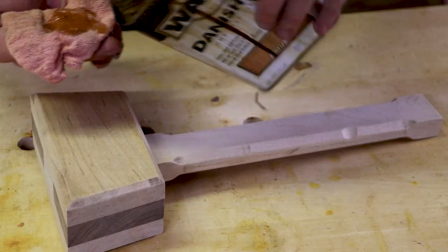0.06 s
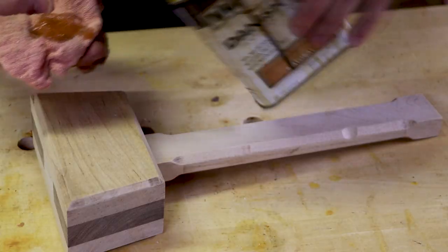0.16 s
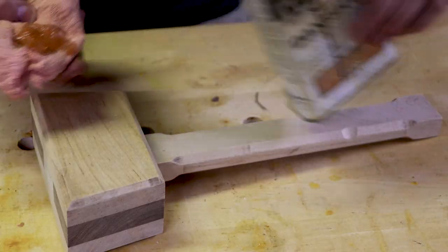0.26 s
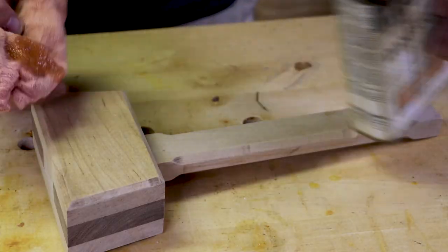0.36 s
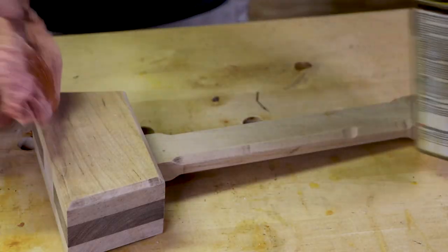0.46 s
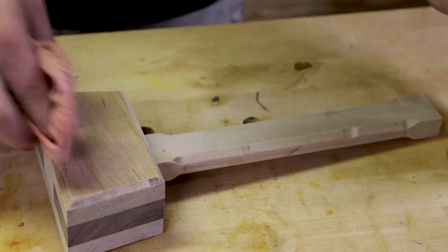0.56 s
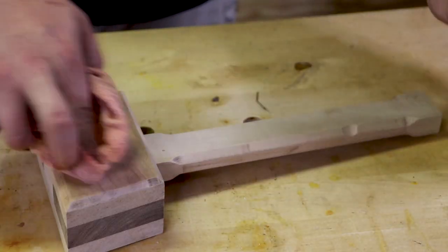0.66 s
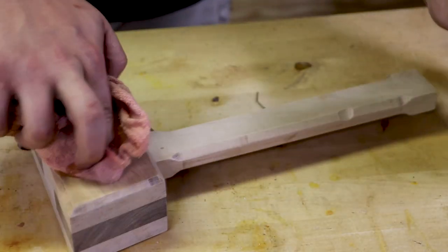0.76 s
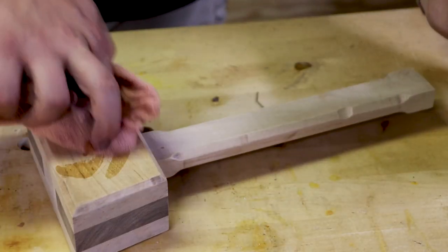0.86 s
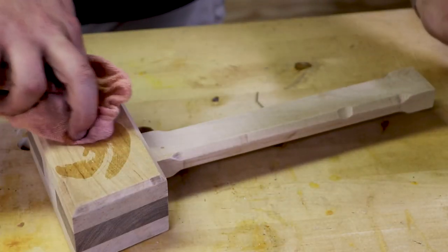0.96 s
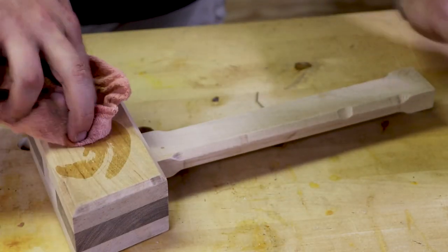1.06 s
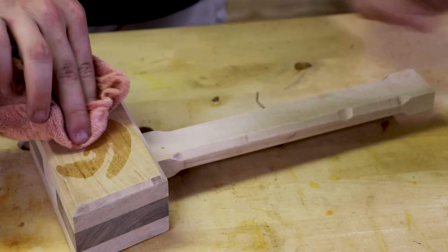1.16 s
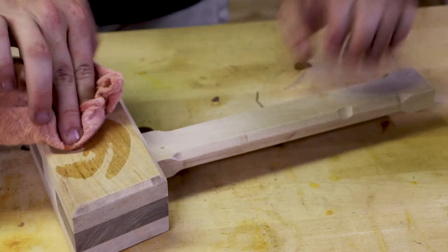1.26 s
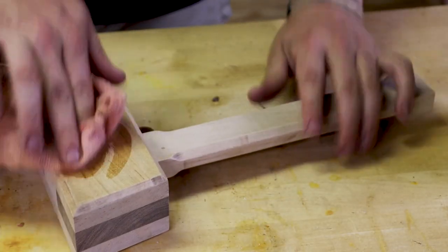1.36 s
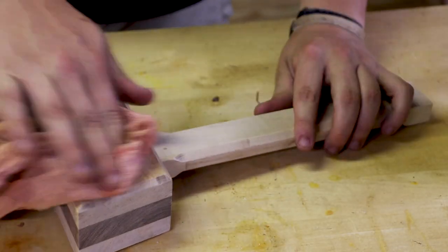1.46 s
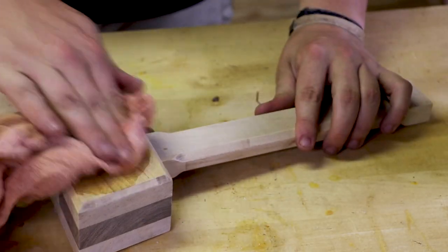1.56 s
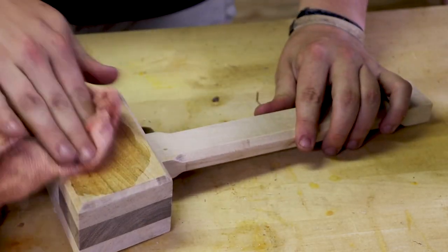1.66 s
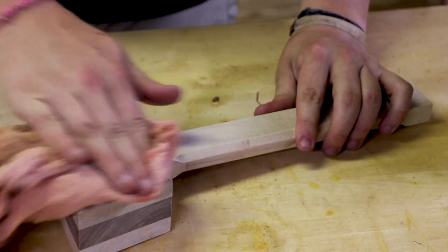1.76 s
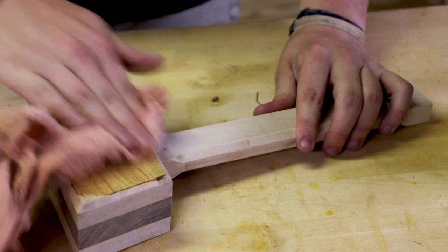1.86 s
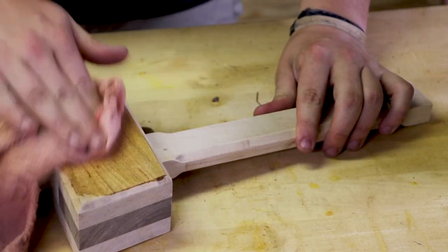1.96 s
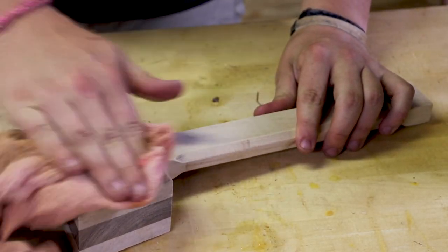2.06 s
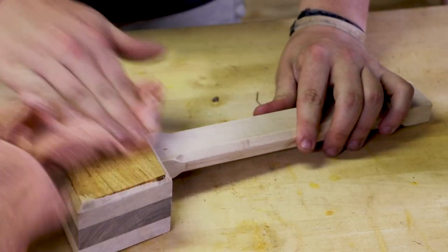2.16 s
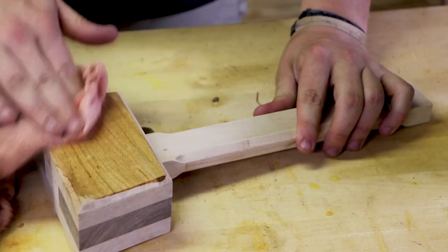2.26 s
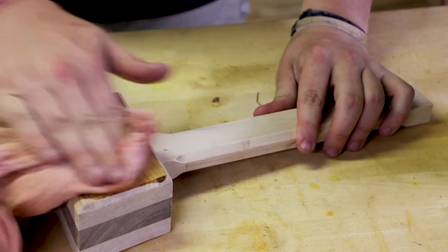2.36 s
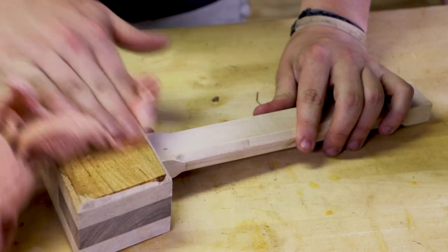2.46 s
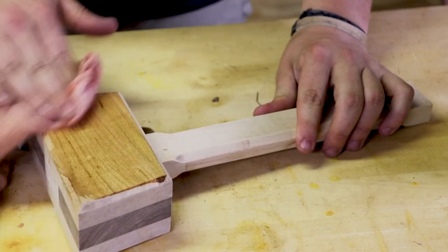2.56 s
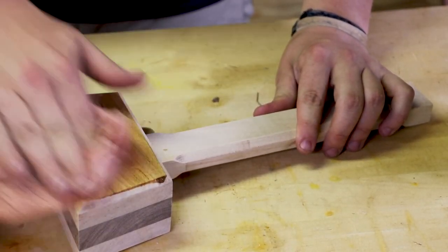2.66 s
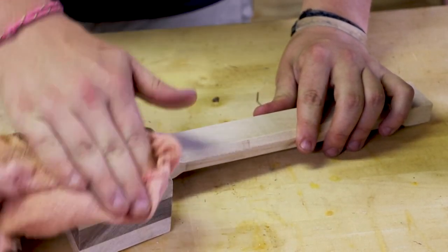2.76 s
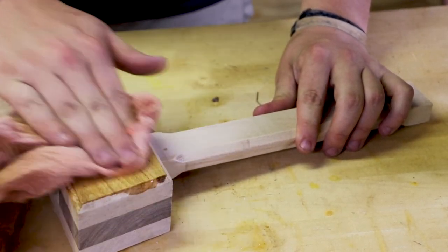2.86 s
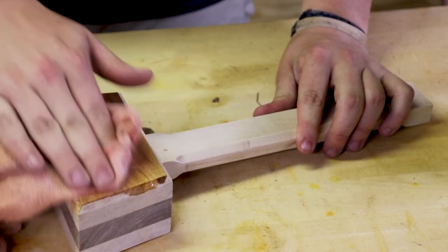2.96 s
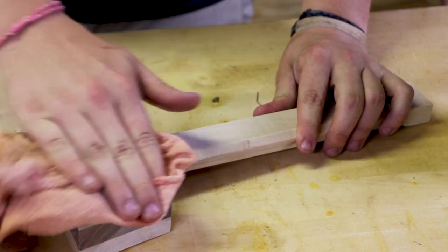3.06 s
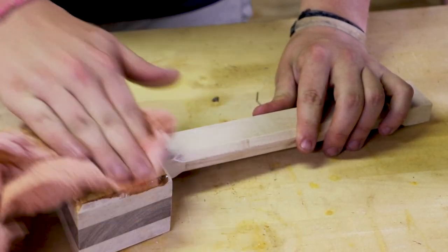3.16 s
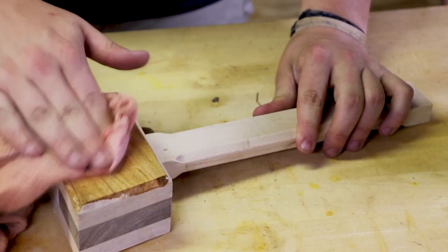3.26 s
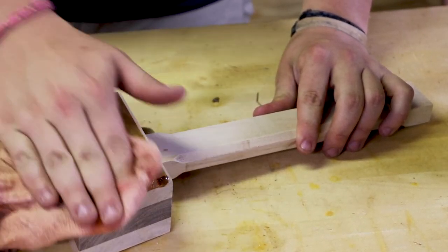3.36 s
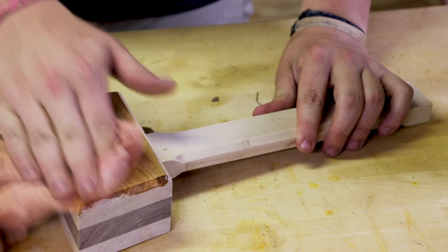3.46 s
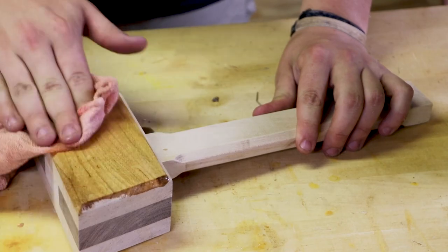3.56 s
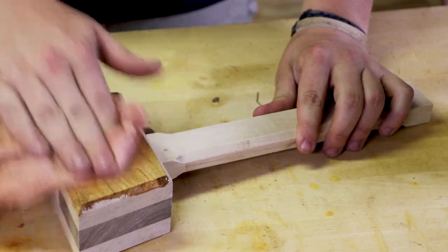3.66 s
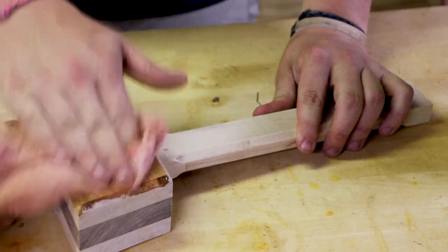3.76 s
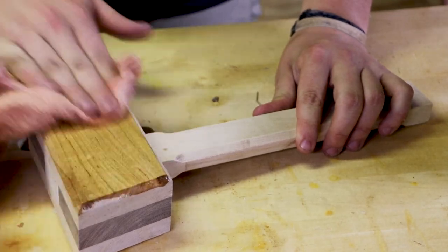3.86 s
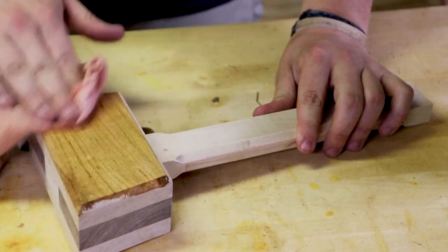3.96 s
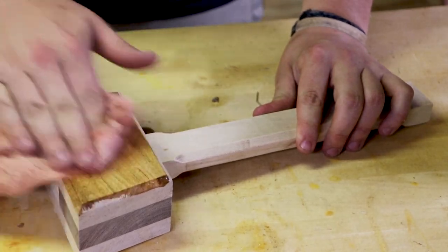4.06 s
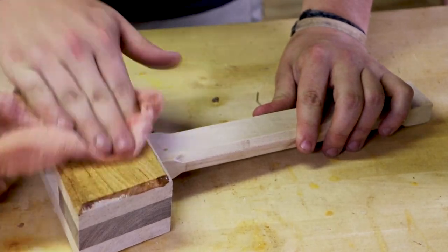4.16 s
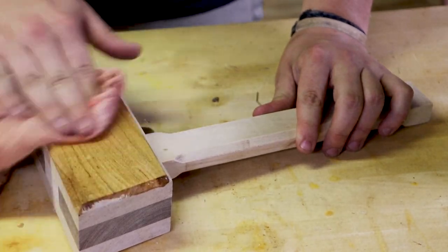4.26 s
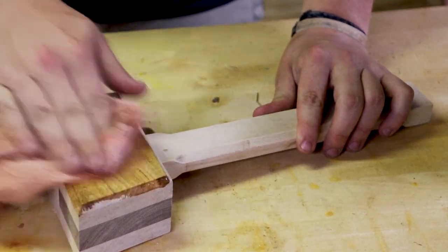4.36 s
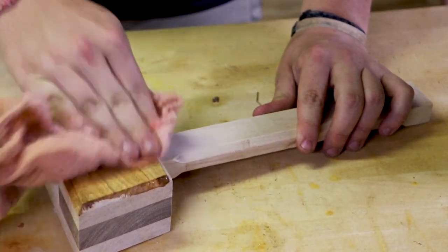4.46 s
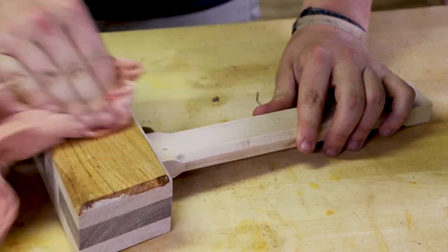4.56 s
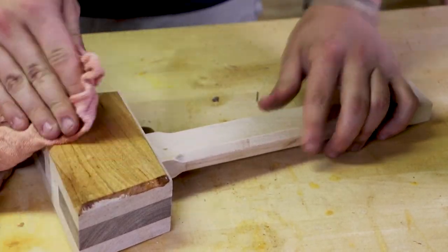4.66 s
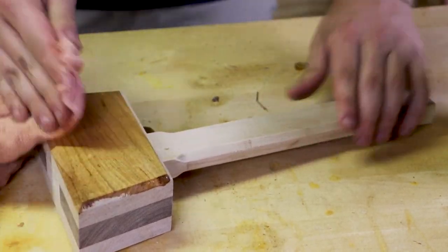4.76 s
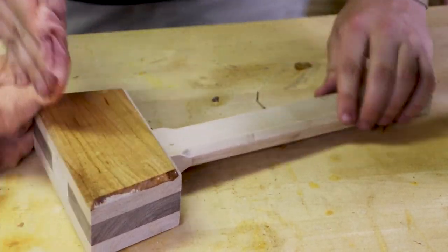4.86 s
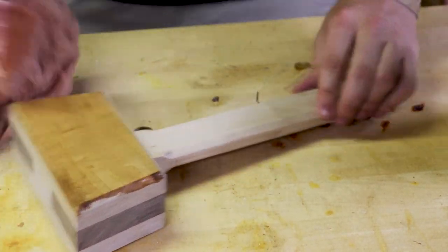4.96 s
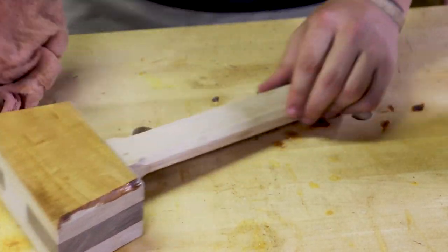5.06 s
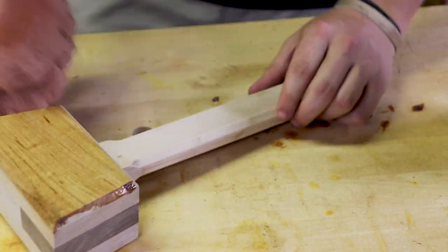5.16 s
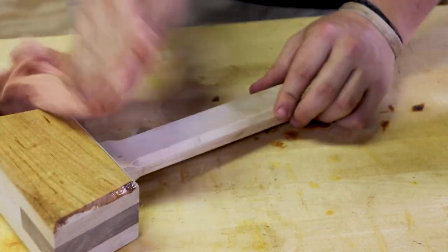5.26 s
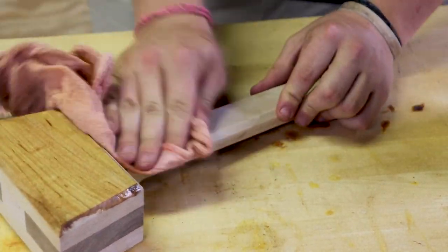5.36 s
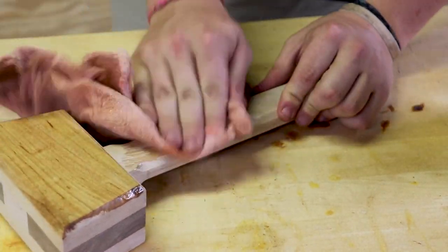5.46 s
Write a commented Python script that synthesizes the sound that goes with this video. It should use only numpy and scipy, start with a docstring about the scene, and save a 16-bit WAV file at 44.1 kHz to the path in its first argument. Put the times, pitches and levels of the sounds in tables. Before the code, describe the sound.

In a small workshop, close up, a faint knock is followed by a tin can clunking onto a wooden bench. A rag dabs softly, small ticks and a sharp wooden knock follow, then brisk swishing rubs shake the bench with a dull shudder. Near the end the mallet is knocked, dragged with a harsh groaning chatter and dropped; the rag resumes faintly and duller.

```python
"""A rag rubs a wooden mallet to and fro on a wooden workbench: band-shaped hiss plus stick-slip shudder.
After a faint knock and a dab of the rag a tin can is set down; the mallet is knocked again, dragged round
and dropped back. Half-sine pushes ring decaying modes, random slips make the chatter of the drag, and
sparse taps give room reflections. Behind lie air noise and mains tones; a limiter ducks the loud blows
and peaks clip."""
import sys
import numpy as np
from scipy import signal
from scipy.fft import rfft, irfft, next_fast_len
from scipy.io import wavfile
from scipy.ndimage import uniform_filter1d

SR = 44100
rng = np.random.default_rng(int(sys.argv[2]) if len(sys.argv) > 2 else 0)


def ratio(d):
    """dB to gain"""
    e = np.asarray(d, float) / 20
    return 10 ** e


def output_pcm(signal):
    """Save a mono or channel-first signal as 16-bit PCM at the path in sys.argv[1].

    Samples are clipped to [-1, 1] before scaling.
    """
    pcm = np.clip(np.atleast_2d(signal).T, -1, 1) * 32767
    wavfile.write(sys.argv[1], SR, np.round(pcm).astype(np.int16))


N = 242991

# modes of the wooden mallet: pitch_hz, relative_level_db, t60_s
MALLET_MODES = [(1840, -3, 0.033), (2763, 2.5, 0.05), (4660, 0.5, 0.02), (6920, -20, 0.011),
                (12100, -19, 0.004), (14700, -16, 0.0032)]


def evened(x):
    """Scales a signal to unit rms."""
    return x / np.sqrt(np.mean(x ** 2) + 1e-20)


def read(points, hz):
    """Second column of a table, interpolated over log frequency."""
    f, value = np.transpose(points)
    return np.interp(np.log(hz + 1), np.log(f + 1), value)


def band_of(x, edges_hz, order=2):
    """Butterworth bandpass."""
    return signal.sosfilt(signal.butter(order, edges_hz, "band", fs=SR, output="sos"), x)


def curves(rows):
    """Columns of a table at every sample, and a gate that is open while it lasts."""
    s, *columns = np.transpose(rows)
    t = np.arange(N) / SR
    gate = np.clip(np.minimum(t - s[0], s[-1] + 0.093 - t) / 0.023, 0, 1)
    return gate, [np.interp(t, s, c) for c in columns]


def bump(s, ms):
    """A smooth hump of height one, ms wide at 1/e."""
    return np.exp(-(2 * (np.arange(N) / SR - s) / (ms / 1000)) ** 2)


def wander(ms):
    """Smoothed random drift of unit rms."""
    span = round(ms * SR / 1000)
    return evened(uniform_filter1d(uniform_filter1d(rng.standard_normal(N), span), span))


def noise(shape_db, patchy_db):
    """Random short-time spectra with drifting patches; shape_db maps Hz and seconds to dB."""
    frames, hz = N // 128 + 5, np.fft.rfftfreq(512, 1 / SR)
    a, b, patches = rng.standard_normal((frames, 257, 3)).T
    patches = uniform_filter1d(patches, size=8, axis=0)
    patches = evened(uniform_filter1d(patches, size=16, axis=1))
    field = shape_db(hz[:, None], np.arange(frames) * 128 / SR) + patchy_db * patches
    return signal.istft((a + 1j * b) * ratio(field), nperseg=512, noverlap=384)[1][:N]


def ring(force, modes):
    """A force sets every mode ringing; slow pushes move little air, hence the low cut."""
    t = np.arange(SR // 2) / SR
    body = sum(ratio(db - 60 * t / t60) * np.sin(2 * np.pi * hz * t) for hz, db, t60 in modes)
    body = signal.sosfilt(signal.butter(4, 130, "high", fs=SR, output="sos"), body)
    return signal.oaconvolve(force, body)[:N]


def add(force, s, db, ms):
    """Adds one blow: a half-sine push whose area is set in dB."""
    push = np.sin(np.pi * np.clip(np.arange(.5, 300) / max(ms * SR / 1000, 1), 0, 1))
    part = force[round(s * SR):][:300]
    part += ratio(db) * push[:len(part)] / push.sum()


def slips(per_s, spread_db):
    """Sparse uneven stick-slip clicks of random sign."""
    size = ratio(spread_db * np.minimum(rng.exponential(1, N), 4)) * rng.choice([-1., 1.], N)
    return size * (rng.random(N) < per_s / SR)


def air():
    """Still air of the workshop as shaped noise, with slightly wavering mains tones."""
    # noise spectrum: freq_hz, relative_level_db_per_hz
    air_spectrum = [(20, 8.5), (45, -7), (62, 8.5), (95, 3), (122, 1), (160, -2.5), (330, -8), (500, -13),
                    (1200, -18), (3000, -21.5), (5000, -23.5), (16000, -29.5)]
    # mains tones: pitch_hz, relative_level_db
    mains_tones = [(721, -67), (1319, -71.5), (1561, -67)]
    air_rms_db = -49
    t = np.arange(N) / SR
    hum = np.zeros(N)
    for hz, relative_db in mains_tones:
        waver = np.sin(2 * np.pi * (rng.uniform(1, 4.5) * t + rng.random()))
        level_db = relative_db + 1.0 + 2.0 * waver
        hum += ratio(level_db) * np.sin(2 * np.pi * (hz * t + rng.random()))
    spectrum = rfft(rng.standard_normal(N)) * ratio(read(air_spectrum, np.fft.rfftfreq(N, 1 / SR)))
    return ratio(air_rms_db) * evened(irfft(spectrum, N)) + hum


def shop(x):
    """Workshop reflections: sparse, of random sign, each band dying at its own speed."""
    # room decay: freq_hz, t60_s
    room_decay = [(150, 0.25), (600, 0.23), (2000, 0.12), (6000, 0.054)]
    taps = np.zeros(SR // 2)
    at = np.arange(200, len(taps) - 20, 20)
    taps[at + rng.integers(0, 20, len(at))] = rng.choice([-1., 1.], len(at))
    hz, t, z = signal.stft(taps, SR, nperseg=256)
    tail = signal.istft(z * ratio(-60 * t / read(room_decay, hz)[:, None]), SR, nperseg=256)[1]
    return signal.oaconvolve(x, tail / np.linalg.norm(tail))[:N]


def ticks():
    """Small dry ticks: decaying noise bursts, band-passed into the treble."""
    # ticks: start_s, level_before_filter_db, lowest_hz, t60_s
    tick_rows = [(1.3043, -16.5, 1620, .011), (5.213, -38, 5900, 0.016)]
    out = np.zeros(N)
    for s, db, lowest_hz, t60 in tick_rows:
        after = np.arange(N) / SR - s
        burst = rng.standard_normal(N) * (after > 0) * ratio(db - 60 * abs(after) / t60)
        out += band_of(burst, [lowest_hz, 3.5 * lowest_hz])
    return out


def squeaks():
    """Faint squeaks of the damp cloth: narrow bands of hiss that slide in pitch as it creeps."""
    # squeaks: start_s, end_s, from_hz, to_hz, level_db
    squeak_rows = [(1.4, 1.49, 4900, 4550, -53), (1.46, 1.55, 4300, 3750, -51)]
    width_hz = 190
    t, out = np.arange(N) / SR, np.zeros(N)
    smooth = signal.butter(2, width_hz / 2, fs=SR, output="sos")
    for start, end, from_hz, to_hz, db in squeak_rows:
        phase = 2 * np.pi * np.cumsum(np.interp(t, [start, end], [from_hz, to_hz])) / SR
        a, b = signal.sosfilt(smooth, rng.standard_normal((2, N)))
        band = evened(a * np.cos(phase) + b * np.sin(phase))
        out += ratio(db) * bump((start + end) / 2, 1000 * (end - start)) ** 2 * band
    return out


def shudder():
    """Soft slips shake the bench; the steady weight of the hand evens out their swells."""
    # bench modes with the mallet held down: pitch_hz, relative_level_db, t60_s
    pressed_modes = [(157, -26, .08), (249.2, -9.5, 0.15), (280.4, 1, 0.083), (384, -1.5, 0.027),
                     (548, -4.5, 0.064), (1059, -0.5, 0.03)]
    soft_slips = signal.lfilter([1], [1, -.88], slips(2500, spread_db=1.0))
    shake = ring(soft_slips, pressed_modes)
    return evened(shake / (uniform_filter1d(shake ** 2, size=900) + 1e-9) ** 0.12)


def boom(scrape):
    """The long drag rocks the bench into its slow sway: one low mode driven by the rectified scrape."""
    sway_hz, gain_db, t60_s = 70, -34, .6
    t = np.arange(SR // 2) / SR
    sway = ratio(-60 * t / t60_s) * np.sin(2 * np.pi * sway_hz * t)
    # acceleration of the sway, scaled back to its size
    push = np.diff(sway / np.linalg.norm(sway), 2) * (SR / (2 * np.pi * sway_hz)) ** 2
    return ratio(gain_db) * signal.oaconvolve(abs(scrape), push)[:N]


def sliding_mode(force, hz, db, t60, slide_ms):
    """One mode of the sliding mallet: it catches at its own moments and its pitch wavers."""
    catch_db, catch_ms = 2.5, 14
    waver_share = .005
    bend_s, bend_ms, bend_share = 5.08, 110, .03  # upper modes bend up at the hardest of the drag
    caught = ring(force * ratio(catch_db * wander(catch_ms)), [(hz, db, t60)])
    tone = signal.hilbert(caught, next_fast_len(N))[:N]
    share = waver_share * wander(slide_ms) + bend_share * bump(bend_s, bend_ms) * (hz > 4000)
    return (tone * np.exp(2j * np.pi * np.cumsum(share) * hz / SR)).real


def drag():
    """Wood chatters, rasps and groans on wood in bursts and shakes the bench."""
    # bursts, each a list of: time_s, chatter_level_db, bench_shudder_level_db
    bursts = [
        [(.95, -97, -89), (1.03, -44, -52), (1.1, -57, -52), (1.28, -62, -59)],
        [(4.86, -36, -13), (4.9, -40, -22.5), (4.94, -27.5, -19), (4.962, -36, -18), (4.98, -40, -36),
         (5.042, -24, -8), (5.056, -24, -18), (5.1, -26, -9.5), (5.12, -32.5, -42), (5.138, -37, -14),
         (5.18, -42.5, -33), (5.235, -54, -42), (5.27, -60, -63)],
    ]
    # rasp band: low_hz, high_hz
    rasp_band = [600, 7160]
    # groan mode: pitch_hz, relative_level_db, t60_s
    groan_modes = [(540, 0, 0.023)]
    rasp_db, groan_db = -10.5, -3.5  # against the chatter, against the shudder
    slide_share, slide_ms = 0.051, 40  # the shudder's pitch wanders as the contact point slides

    force = slips(2700, spread_db=-2.5) * ratio(2.0 * wander(9.3))
    rung = sum(sliding_mode(force, *mode, slide_ms) for mode in MALLET_MODES)
    rasp = band_of(rng.standard_normal(N), rasp_band, order=3) * ratio(2.0 * wander(13))
    chatter = evened(evened(rung) + ratio(rasp_db) * evened(rasp))

    groan = evened(ring(slips(900, spread_db=1.0) * ratio(12.0 * wander(28)), groan_modes))
    pitch = np.exp(slide_share * wander(slide_ms))
    low = np.interp(np.cumsum(pitch) % N, np.arange(N), shudder())
    # the sliding weight damps the upper modes
    low = signal.sosfilt(signal.butter(4, 720, fs=SR, output="sos"), low)
    bench = ratio(groan_db) * groan + low

    out = np.zeros(N)
    for rows in bursts:
        gate, (chatter_db, bench_db) = curves(rows)
        out += gate * (ratio(chatter_db) * chatter + ratio(bench_db) * bench)
    return out


def crackle(force):
    """The dense upper modes of the wood: a bright snap, a short clatter and a duller, longer rattle."""
    t, (a, b, c) = np.arange(12000) / SR, rng.standard_normal((3, 12000))
    snap = uniform_filter1d(a, size=3) * ratio(-60 * t / 0.006)
    clatter = band_of(b, [800, 3200]) * ratio(12 - 60 * t / 0.023)
    rattle = band_of(c, [650, 1900]) * ratio(3.0 - 60 * t / 0.17)
    return signal.oaconvolve(force, snap + clatter + rattle)[:N]


def knocks():
    """Each knock pushes the bench, rocks the mallet and cracks; the can rings once and its tin rattles on."""
    # mallet knocks: start_s, bench_push_db, rocking_push_db, crack_push_db, contact_ms
    knock_rows = [(0.324, -40, -57, -66, 1.5), (1.287, -23, -43, -55, 2.3), (1.431, -26, -40, -56, 3.5),
                  (1.466, -21, -38, -63, 3.7), (1.5374, -6, -4, -11.5, 0.62),
                  (2.576, -29.5, -50, -25.5, 0.47), (3.4911, -14, -13, -46, 1.58),
                  (3.823, -18.5, -18, -48, 1.7), (4.8241, -9.5, -22, -3.5, 0.74),
                  (4.836, -8, -19, -39, 1.26), (5.0653, -0.5, -8.5, -10, 1.28), (5.143, -5, -16, -15, 1.14),
                  (5.1481, -8.5, -20, -13.5, 0.77), (5.315, -37.5, -50, -36, 0.4)]
    # a corner strikes and the mallet itself rings: start_s, push_db
    corner_rows = [(4.8239, -7), (5.1497, -17)]
    # modes of bench, rocking mallet and can: pitch_hz, relative_level_db, t60_s
    bench_modes = [(276, 1, 0.065), (345, -4, 0.063), (486, -4, 0.043), (556, -21.5, 0.2),
                   (624, -8.5, 0.072), (728, -7.5, 0.073), (772, -1.5, 0.032), (1046, -1.5, 0.037),
                   (1432, -2, 0.1), (880, -0.5, 0.055), (1596, -8.5, 0.061), (2930, -26, 0.016)]
    rock_modes = [(232, 0, .075)]
    can_modes = [(626, -1.5, 0.083), (732, -3.5, 0.05), (780, -10, 0.015), (1133, 6.5, 0.016),
                 (1136, -5, 0.045), (1428, -5.5, 0.071)]
    can_s, can_db, can_bench_db, can_bench_ms = 0.7355, -0.5, -6.5, 0.6

    bench, rock, mallet, edge, can = np.zeros((5, N))
    for s, bench_db, rock_db, crack_db, ms in knock_rows:
        add(bench, s, bench_db, ms)
        add(rock, s, rock_db, ms)
        add(edge, s, crack_db, ms / 4)
    for s, db in corner_rows:
        add(mallet, s, db, .06)

    add(bench, can_s, can_bench_db, can_bench_ms)
    add(can, can_s, can_db, can_bench_ms / 2)
    add(edge, can_s, can_db - 14.5, .12)
    after = np.arange(N) / SR - can_s
    can += slips(2700, spread_db=1.5) * (after > 0) * ratio(-39.5 - 60 * abs(after) / 0.24)

    # a short blow barely moves the heavy bench top
    bench = signal.sosfilt(signal.butter(2, 170, "high", fs=SR, output="sos"), bench)
    wood = ring(bench, bench_modes) + ring(rock, rock_modes) + ring(mallet, MALLET_MODES)
    return wood + ring(can, can_modes) + crackle(edge)


def rag():
    """Fibres hiss over oiled wood, fading where the stroke turns; the hand shakes mallet and bench."""
    # strokes, each a list of: time_s, hiss_level_db
    strokes = [
        [(.62, -89), (.676, -49), (.72, -64)],
        [(.85, -60), (.9, -51.5), (1.03, -47), (1.09, -68), (1.155, -48.5), (1.19, -55.5), (1.22, -49),
         (1.27, -57), (1.36, -58.5), (1.43, -44.5), (1.52, -40), (1.6, -44.5), (1.7, -36), (2.14, -30.5),
         (2.7, -31.5), (3.0, -36), (3.3, -37), (3.56, -32.5), (4.1, -34.5), (4.7, -37), (4.8, -51.5)],
        [(5.27, -65), (5.36, -50.5), (5.5, -45.5)],
    ]
    # hiss spectrum: freq_hz, relative_level_db_per_hz
    hiss_spectrum = [(150, -27), (450, -5.5), (900, -9.5), (2000, -6), (3000, -4.5), (9000, -8),
                     (16000, -12)]
    # the rag slows and turns back: centre_s, treble_dip_db
    turns = [(1.742, 8.5), (2.835, 6), (3.183, 10), (3.488, 20), (3.673, 17.5), (3.818, 13), (3.981, 6.5),
             (4.28, 7)]
    # the hand eases between strokes: centre_s, relative_depth
    eases = [(2.4, 0.5), (2.721, 0), (3.068, 1.5)]
    # the hand shoves the mallet, which shudders on the bench: centre_s, level_db, length_ms
    shove_rows = [(1.872, -36, 96), (2.03, -43, 81), (2.187, -32, 56), (2.274, -35, 26), (2.352, -34, 59),
                  (2.466, -35.5, 70), (2.818, -29.5, 95), (2.893, -34.5, 71), (3.128, -29.5, 81),
                  (3.229, -37, 135), (3.356, -39.5, 81), (3.527, -33, 93), (3.841, -38.5, 48),
                  (4.014, -39, 110), (4.061, -29, 28), (4.383, -40, 90), (4.543, -33.5, 116),
                  (4.715, -35, 170), (5.41, -40.5, 110)]
    turn_ms, ease_ms = 50, 114
    firm_db, dull_per_db = -31.5, 1.0731  # a firm rub is bright; each dB lighter adds lower hiss
    handle_s, handle_dull_db = 5.0, 13  # on the bare handle the rag sounds duller
    rumble_db, wobble_db, wobble_ms = -9, 3, 440  # bench shaking against the hiss, its random swells

    s, level_db = np.transpose(sum(strokes, []))
    dull_db = -2.5 + dull_per_db * np.minimum(firm_db - level_db, 9.0) + handle_dull_db * (s > handle_s)

    def shape_db(hz, t):
        lower_share = 1 / (1 + (hz / 3500) ** 3)
        return read(hiss_spectrum, hz) + lower_share * np.interp(t, s, dull_db)

    hiss = noise(shape_db, patchy_db=2.4)
    treble = signal.sosfiltfilt(signal.butter(2, 4000, "high", fs=SR, output="sos"), hiss)
    turn_db = sum(db * bump(s, turn_ms) for s, db in turns)
    ease = sum(depth * bump(s, ease_ms) for s, depth in eases)
    stroke = sum(gate * ratio(hiss_db) for gate, (hiss_db,) in map(curves, strokes))
    stroke = stroke * ratio(-.3 * ease)

    # a slow rag loses its treble first; an easing hand loses the lower hiss
    slowed = treble * ratio(-turn_db) + (hiss - treble) * ratio(-.6 * turn_db - 4.8 * ease)
    slowed = slowed / np.std(treble)

    # flat-topped pushes
    shoves = sum(ratio(db) * np.minimum(2 * bump(s, ms) ** 2, 1) for s, db, ms in shove_rows)
    rumble = ratio(rumble_db + wobble_db * wander(wobble_ms) - 0.18 * turn_db) * stroke
    return stroke * slowed + (rumble + shoves) * shudder()


def scene():
    """Mixes all sources, with blows and drag echoed by the workshop; both channels are alike."""
    blows, scrape = knocks() + ticks(), drag()
    echoes = shop(ratio(-14.5) * blows + ratio(-11.5) * scrape)
    mono = blows + scrape + echoes + boom(scrape) + rag() + squeaks() + air()
    mono = signal.sosfilt(signal.butter(2, 40, "high", fs=SR, output="sos"), mono)
    return np.array([mono, mono])


def low_pass(x):
    """Removes everything above the highest recorded frequency."""
    return signal.sosfilt(signal.butter(12, 16250, fs=SR, output="sos"), x)


def record(dry):
    """A limiter drops within ten milliseconds of loud blows and lets go slowly; peaks clip."""
    threshold_db, duck_per_db, follower_fall_db_per_s = -13.0, 0.4, 132.0
    power_db = 10 * np.log10(abs(uniform_filter1d(dry[0] ** 2, size=200)) + 1e-12)
    fall_db = np.arange(N) * follower_fall_db_per_s / SR
    held_db = np.maximum.accumulate(power_db + fall_db) - fall_db
    over_db = np.maximum(held_db - threshold_db, 0)
    # the origin makes the average look back only
    duck_db = duck_per_db * uniform_filter1d(over_db, size=400, origin=199)
    finished = np.clip(dry / ratio(duck_db), -1, 1)
    return low_pass(finished)


dry = scene()
out = record(dry)
output_pcm(out)
```